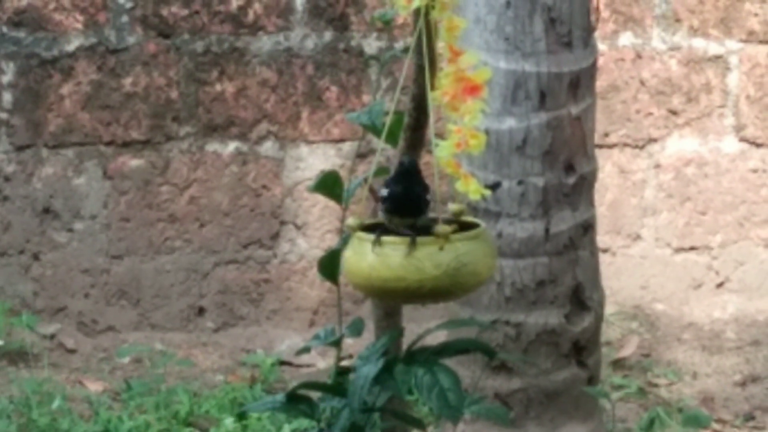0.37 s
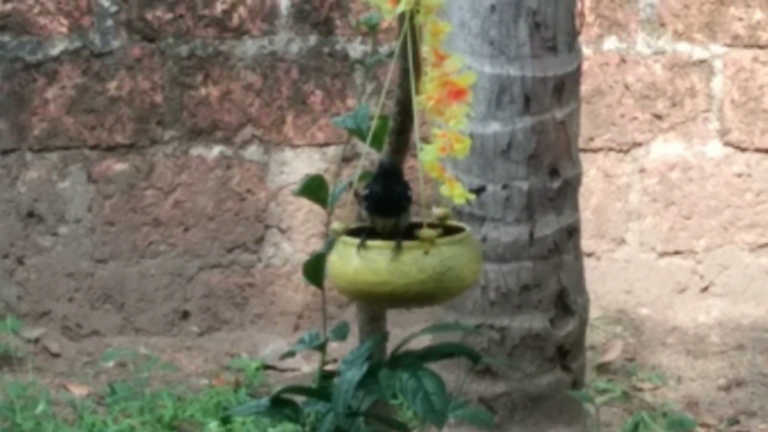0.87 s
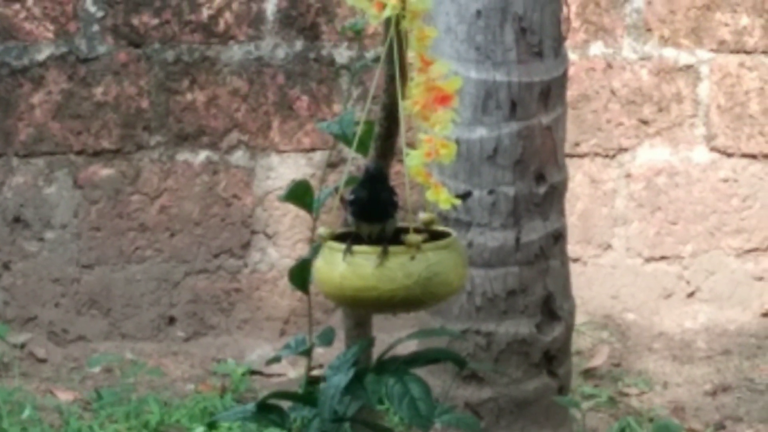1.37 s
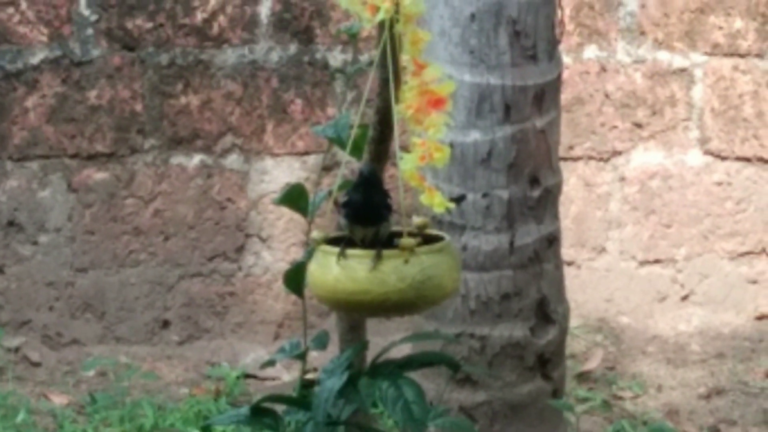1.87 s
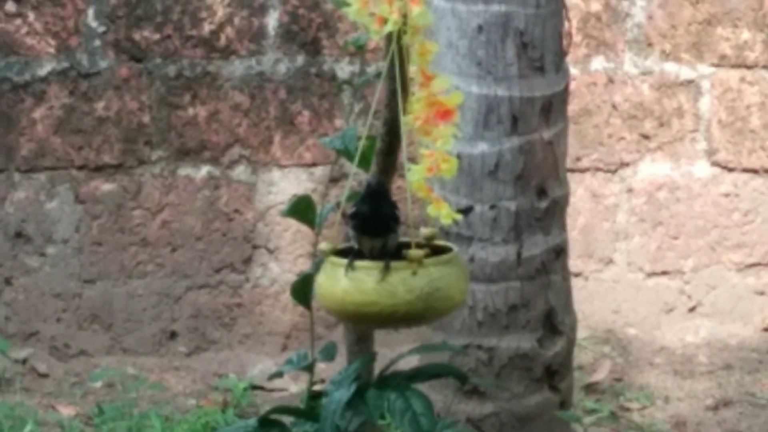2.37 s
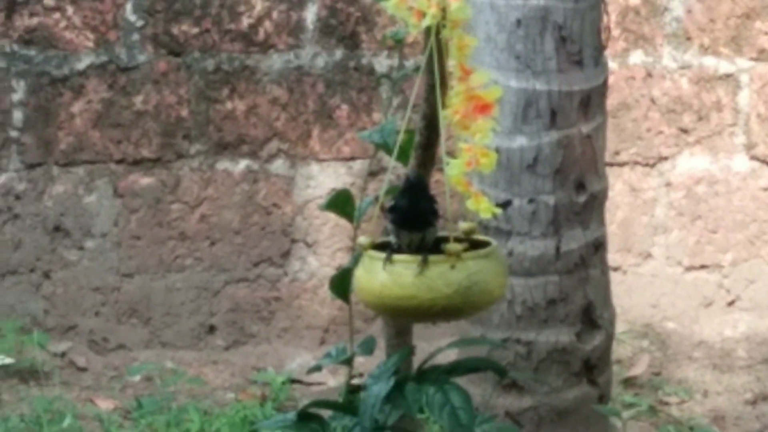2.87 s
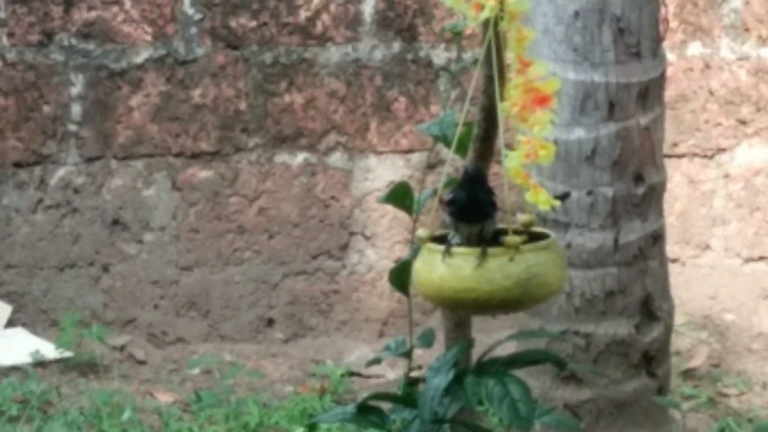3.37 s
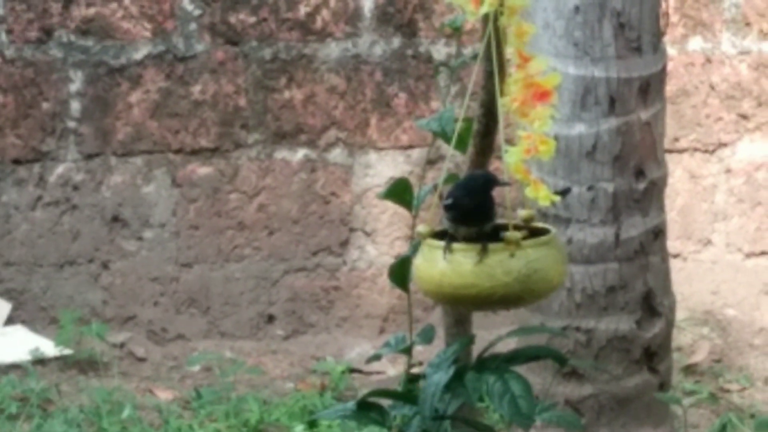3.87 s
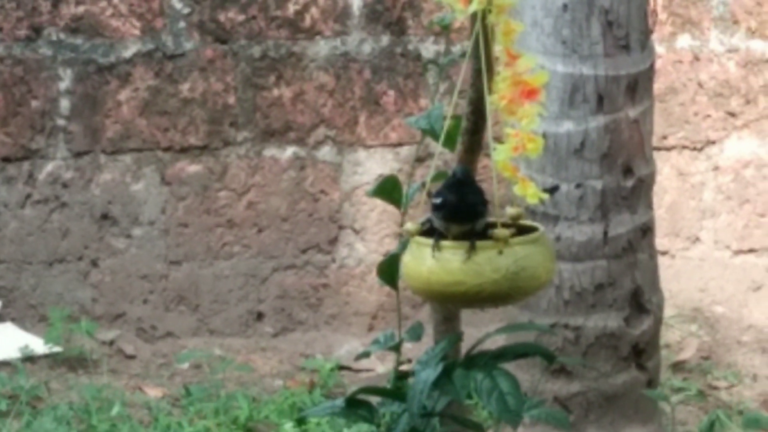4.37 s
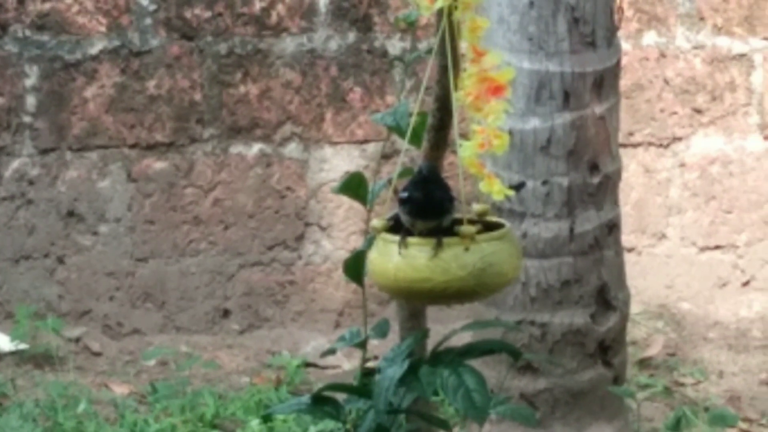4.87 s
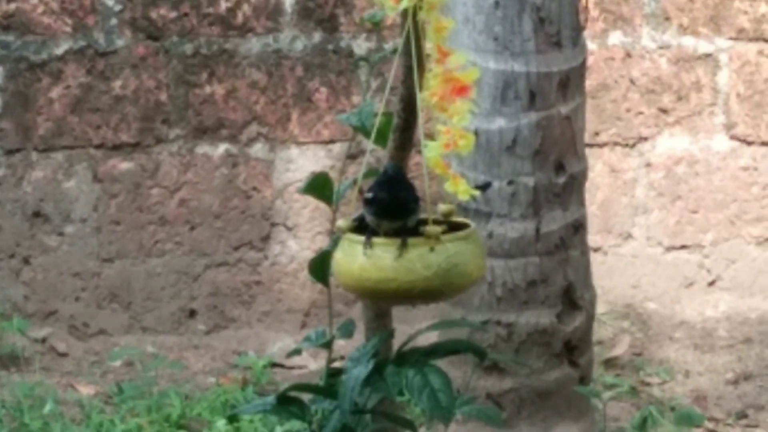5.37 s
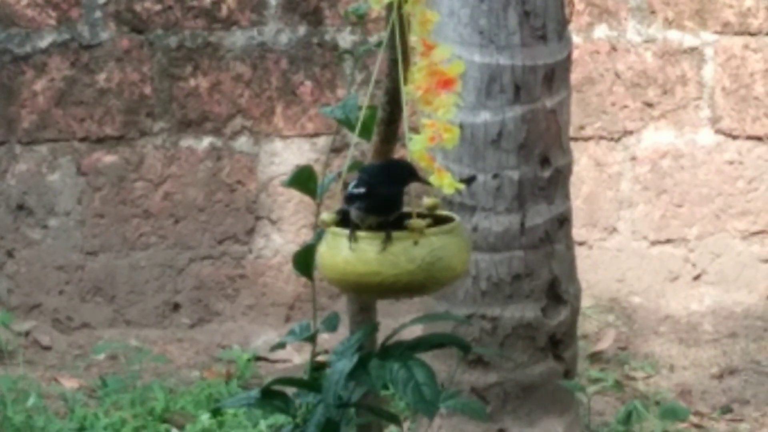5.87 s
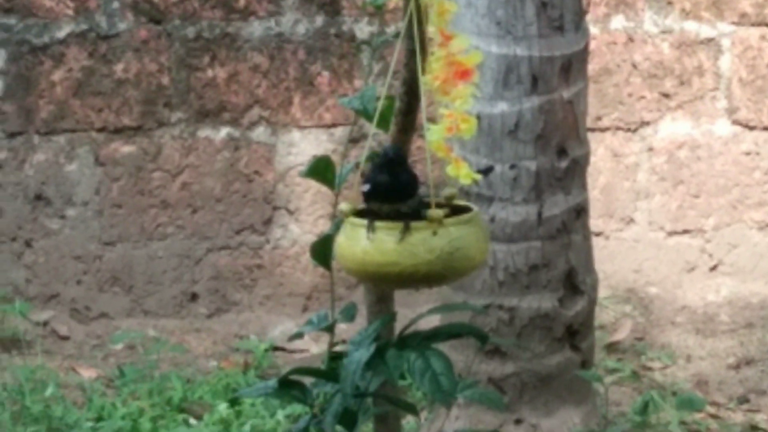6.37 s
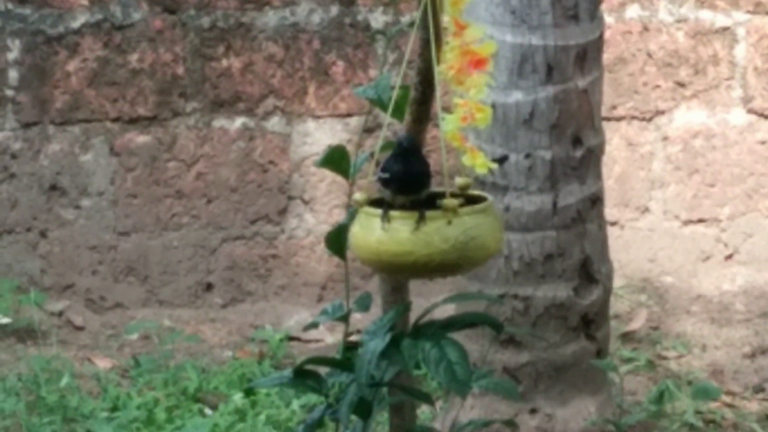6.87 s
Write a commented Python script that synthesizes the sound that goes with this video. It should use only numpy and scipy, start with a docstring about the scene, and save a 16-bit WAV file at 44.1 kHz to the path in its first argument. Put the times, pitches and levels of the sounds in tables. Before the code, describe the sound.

Squeaky, raspy bird chatter in a walled garden, joined midway by a nearer songbird's bright piercing whistles, over soft leaf hiss and distant traffic rumble.

```python
"""Birds in a walled garden

A flock of squeaky birds chatters while a nearer songbird whistles and churrs; a larger bird calls twice far away.
Each voice sums overtones of a clear tone and of a rasp whose pitch wanders at random; walls and leaves scatter it.
Below lie filtered noise for leaf hiss and distant traffic, and resonances for the traffic drone.
The treble of this air dips twice early on and flickers inside the dips."""
import sys
import numpy as np
from scipy import signal
from scipy.fft import rfft, irfft
from scipy.io import wavfile

SR = 44100
rng = np.random.default_rng(int(sys.argv[2]) if len(sys.argv) > 2 else 0)


def dump(signal):
    """Clip the signal to [-1, 1] and save it as 16-bit WAV at the path in sys.argv[1]."""
    limited = np.clip(np.atleast_2d(signal).T, -1, 1)
    pcm = np.round(limited * 32767).astype(np.int16)
    wavfile.write(sys.argv[1], SR, pcm)


def ratio(d):
    """dB to gain"""
    e = np.asarray(d, float) / 20
    return 10 ** e


N = 307818
TIME = np.arange(N) / SR   # s
HZ = np.fft.rfftfreq(N, 1 / SR) + 1   # shifted by 1 Hz so that its logarithm exists


def rms_one(x):
    """Normalisation: scale a signal to a root mean square of 1."""
    return x / np.sqrt(np.mean(x ** 2) + 1e-20)


def at_hz(points):
    """Spectral envelope: interpolate a (Hz, value) table along logarithmic frequency."""
    hz, value = np.transpose(points)
    return np.interp(np.log(HZ), np.log(hz), value)


def wander(size, rate_hz):
    """Random modulation: white noise through a two-pole low-pass, scaled to rms 1."""
    r = np.exp(-2 * np.pi * rate_hz / SR)
    settle = 2000   # samples dropped while the filter settles
    noise = rng.standard_normal(size + settle)
    return rms_one(signal.lfilter([1], [1, -2 * r, r * r], noise)[settle:])


def voice(notes, clear_tones, rasp_tones, waver, hoarse, flutter_db, chaos, chaos_hz, sag, strain, burst_db):
    """Vibrating membrane: steady motion gives clear overtones, chaotic motion a lower, randomly wandering pitch.

    A note lists points (time_s, pitch_hz, clear_db, rasp_db); waver, hoarse, chaos and sag are shares of pitch."""
    out = np.zeros(N)
    for note in notes:
        s, *columns = np.transpose(note)
        span = slice(int(s[0] * SR), min(int(s[-1] * SR), N))
        t = TIME[span]
        hz, clear_db, rasp_db = [np.interp(t, s, column) for column in columns]
        size = len(hz)

        # the clear tone turns hoarse as the rasp takes over
        roughness = 1 / (1 + ratio(clear_db - rasp_db) ** 2)
        steady_hz = hz * (1 + (waver + hoarse * roughness) * wander(size, 111.8))
        broken_hz = sag * hz * (1 + chaos * wander(size, chaos_hz))
        steady_phase = np.cumsum(2 * np.pi * steady_hz / SR)
        broken_phase = np.cumsum(2 * np.pi * broken_hz / SR)

        clear_db = clear_db + flutter_db * wander(size, 78)   # uneven breath
        rasp_db = rasp_db + burst_db * wander(size, 69.4)   # the rasp comes in bursts
        ramp = np.clip(np.minimum(t - s[0], s[-1] - t) / .008, 0, 1)   # 8 ms at either end
        for phase, db, tones in (steady_phase, clear_db, clear_tones), (broken_phase, rasp_db, rasp_tones):
            effort_db = strain * (db - db.max())   # higher overtones grow more with effort
            for multiple, tone_db in tones:
                level = ratio(db + tone_db + multiple * effort_db)
                out[span] += ramp * level * np.sin(multiple * phase)
    return out


def shaped(shape, s, hz, length, db, rasp_db):
    """Similarity: stretch one note shape to a given start, pitch, length and levels."""
    return [(s + share * length, pitch * hz, db + clear, rasp_db + rasp) for share, pitch, clear, rasp in shape]


def flock():
    """Onset of chaos: each squeak slides up to pitch, holds, then sags and breaks into a rasp."""
    # squeaks: start_s, pitch_hz, opening slide (share of pitch), clear_s, clear_db, rasp_db
    squeaks = [(.97, 2025, .05, 0.04176, -65, -64), (1.1, 2060, .05, .05, -66.5, -65.5),
               (1.268, 2250, 0.13, 0.112, -55.5, -62.5), (1.663, 2390, .11, .097, -51, -55),
               (1.85, 2346, .05, 0.0498, -50, -55), (2.11, 2432, 0, 0.052, -61.5, -60),
               (2.234, 2558, .04, .105, -43, -51.5), (2.43, 2198, 0.0021, 0.0404, -54.5, -58),
               (2.805, 2390, 0.0513, 0.074, -47.5, -49), (2.99, 2323, .03, 0.06906, -45.5, -50),
               (3.59, 2356, 0.0021, .083, -49, -50), (4.199, 2298, 0.017, 0.0933, -49.5, -55),
               (4.595, 2236, 0, 0.096, -52, -54.5), (5.008, 2336, 0.0115, .095, -47.5, -54),
               (5.2, 2212, 0.018, 0.0439, -54, -53.5), (5.34, 2176, .05, 0.0604, -53, -56),
               (5.51, 2181, .03, 0.0356, -54, -54), (5.64, 2210, 0.037, 0.0592, -52, -54.5),
               (5.8, 2233, .05, 0.049, -50, -53), (5.93, 2169, 0.076, 0.0967, -54.5, -54),
               (6.1, 2301, 0.043, 0.0267, -58, -60), (6.362, 2338, 0.089, 0.139, -49, -50.5),
               (6.59, 2193, 0.028, 0.0596, -47.5, -55), (6.68, 2441, 0.068, 0.0374, -49, -53),
               (6.82, 2008, 0.042, 0.0311, -55.5, -57.5), (6.92, 1730, 0.0032, 0.046, -67.5, -61)]
    # overtones of the clear tone: multiple, level_db
    clear_tones = [(1, -1), (2, 2.5), (3, -5.5), (4, -15), (5, -14), (6, -15)]
    # overtones of the rasp: multiple, level_db
    rasp_tones = [(1, -0.5), (2, 1.5), (3, -2), (4, -10.5), (5, -30.5), (6, -8.5)]
    attack_s, rasp_s = 0.011924, .125
    slide_per_s = 2.5   # share of pitch per second
    rasp_sag = 0.0361   # share of pitch lost during the rasp
    onset_db, before_break_db = -10, -11   # clear tone at the start; rasp before the break
    fade_db, rasp_fade_db = -14, -7.5   # clear tone and rasp at the end

    notes = []
    for s, hz, scoop, clear_s, db, rasp_db in squeaks:
        early_rasp_db = rasp_db + before_break_db
        slide_s = max(attack_s + 0.00065, min(scoop / slide_per_s, 0.608 * clear_s))
        break_s = s + clear_s
        notes.append([
            (s, (1 - scoop) * hz, db + onset_db, early_rasp_db),
            (s + attack_s, (1 - .7 * scoop) * hz, db - 6, early_rasp_db),
            (s + slide_s, hz, db, early_rasp_db),
            (break_s, hz, db, early_rasp_db),
            (break_s + .006, hz, db - 3, rasp_db),
            (break_s + rasp_s, (1 - rasp_sag) * hz, db + fade_db, rasp_db + rasp_fade_db)])
    return voice(notes, clear_tones, rasp_tones, waver=.008, hoarse=0.0549, flutter_db=2.5,
                 chaos=0.18, chaos_hz=1438.2, sag=0.97, strain=0.0437, burst_db=1.0)


def songbird():
    """Frequency modulation: hooks, falling sweeps and level whistles come from one clear throat."""
    # hooks, up to a top then down onto a landing note: start_s, top_hz, landing_hz, landing_s, level_db
    hooks = [(3.238, 4922, 3119, 0.03445, -36.5), (3.46, 4746, 3211, 0.0367, -36)]
    # falling sweeps: start_s, pitch_hz, length_s, level_db
    sweeps = [(3.664, 4837, .17, -39), (4.079, 4680, .16, -39.5)]
    # shape of a sweep: share of length, share of pitch, clear_db, rasp_db
    sweep_shape = [(0, 0.997, -23, -26.5), (.15, .86, -6, -16), (.3, .73, 0.5, -8.5), (.5, .63, -11, -7),
                   (.75, .57, -16.5, -15.5), (1, .5, -31.5, -20)]
    # level whistles, loud and faint: start_s, pitch_hz, length_s, level_db, churr_db
    whistles = [(1.974, 2880, 0.1065, -62, -67), (2.473, 2724, 0.0994, -53.5, -59),
                (2.633, 1766, 0.24, -66.5, -65), (2.961, 4198, 0.0812, -55.5, -53.5),
                (3.893, 3166, 0.1136, -30.5, -48.5), (4.314, 3069, 0.1313, -34.5, -51.5),
                (4.572, 2991, 0.1345, -36, -49), (6.444, 1710, 0.087, -60.5, -81)]
    # shape of a whistle, churring in the middle: share of length, share of pitch, clear_db, churr_db
    whistle_shape = [(0, 1, -11, -1.5), (.12, .99, -3.5, -1.5), (.35, .985, -4.5, -2),
                     (.6, 1.01, -4.5, 2.5), (.85, 1.005, -1.5, -23.5), (1, 1.01, -37, -11)]
    # overtones of the clear tone: multiple, level_db
    song_tones = [(1, 5), (2, -15.5), (3, -11), (4, -19.5)]
    # overtones of the churr: multiple, level_db
    churr_tones = [(1, 5.5), (2, -11.5), (3, -3), (4, -19)]
    hook_start, knee = .78, .93   # shares of the top pitch at the start and in mid-rise
    rise_s, top_s, drop_s, churr_s = 0.029, .018, .011, 0.0385
    start_db, top_db, landing_db = -4, 0, -1   # clear tone
    hook_rasp_db, hook_churr_db = -15.5, -8   # rasp under it; churr after the landing

    notes = []
    for s, top, low, landing_s, db in hooks:
        steps_s = [0, rise_s / 2, rise_s / 2, top_s, drop_s / 2, drop_s / 2, landing_s, churr_s]
        times = s + np.cumsum(steps_s)
        pitch = [hook_start * top, knee * top, top, top, (top + 2 * low) / 3, low, low, low]
        clear = [start_db, start_db, top_db, top_db - 6, top_db - 6, landing_db, landing_db - 3, -30]
        rasp = [hook_rasp_db] * 6 + [hook_churr_db - 3, hook_churr_db]
        notes.append(np.transpose([times, pitch, db + np.array(clear), db + np.array(rasp)]))
    notes += [shaped(sweep_shape, *row, row[-1]) for row in sweeps]
    notes += [shaped(whistle_shape, *row) for row in whistles]
    return voice(notes, song_tones, churr_tones, waver=0.005362, hoarse=0.0747, flutter_db=2.48,
                 chaos=0.1557, chaos_hz=1422, sag=.9, strain=0.115, burst_db=3.0)


def far_caller():
    """Low-pitched membrane: a larger bird repeats one call far away."""
    # calls: start_s, pitch_hz, length_s, level_db
    calls = [(2.808, 531, .33, -75), (3.988, 534, .33, -68)]
    # shape of a call, level then sinking: share of length, share of pitch, clear_db, rasp_db
    call_shape = [(0, .91, -8, -24.5), (.1, 0.992, -2, -22), (.43, 0.99, -0.5, -20), (.5, .93, -2.5, -5),
                  (.8, .885, -10.5, -8.5), (1, 0.78, -21.5, -13.5)]
    # overtones of clear tone and rasp alike: multiple, level_db
    call_tones = [(1, -31.5), (2, 8.5), (3, 18), (4, -25.5)]
    notes = [shaped(call_shape, *row, row[-1]) for row in calls]
    return voice(notes, call_tones, call_tones, waver=0.009, hoarse=0.016, flutter_db=0.5,
                 chaos=0.0964, chaos_hz=191.4, sag=0.98, strain=0.186, burst_db=-2.5)


def garden(x, lead_s, scatter_db):
    """Reverberation: direct sound reaches the left port first; near walls and leaves return a lumpy dying scatter."""
    garden_t60_s, wall_t60_s, wall_db = 1, .12, 12   # walls start louder and die sooner
    lumpy_db = 4
    t = TIME[:SR]
    lumps = ratio(lumpy_db * np.array([wander(SR, 180), wander(SR, 63.3)]))
    decay = ratio(-60 * t / garden_t60_s) + ratio(wall_db - 60 * t / wall_t60_s)
    gap = np.clip((t - .003) / 0.00183, 0, 1)   # nothing returns in the first 3 ms
    scatter = rng.standard_normal((2, SR)) * lumps * decay * gap
    # scatter energy relative to the direct sound
    scatter *= ratio(scatter_db) / np.sqrt(np.sum(scatter ** 2, axis=1, keepdims=True))
    late = np.interp(TIME - lead_s, TIME, x)
    return np.array([x, late]) + signal.fftconvolve(x[None], scatter, axes=1)[:, :N]


def treble_db():
    """Gain modulation: the air's treble follows a slow curve with dips that flicker."""
    # slow curve of the treble: time_s, level_db
    slow_curve = [(0, 3), (1, 3), (1.55, 9), (1.64, -2.5), (1.7, 9), (6.98, 9)]
    # dips at full depth: start_s, end_s, depth_db before flicker
    treble_dips = [(0.139, 0.466, -22), (0.837, 0.925, -23.5)]
    fall_s, rise_s = 0.0196, 0.05   # before the start and after the end of full depth
    flicker_gap_s, flicker_s, flicker_share = .04, .016, .8   # mean gap; creep time constant; share of dip

    # inside a dip the treble creeps back and is cut again
    gap, size = rng.random((int(2 * N / SR / flicker_gap_s) + 9, 2)).T
    cuts = np.cumsum((gap + .5) * flicker_gap_s)
    upcoming = np.searchsorted(cuts, TIME)
    creep = np.sqrt(size[upcoming]) * np.exp((TIME - cuts[upcoming]) / flicker_s)
    dips = np.zeros(N)
    for start, end, db in treble_dips:
        dips += db * np.clip(np.minimum((TIME - start) / fall_s + 1, (end - TIME) / rise_s + 1), 0, 1)
    return np.interp(TIME, *np.transpose(slow_curve)) + dips * (1 - flicker_share * creep)


def air():
    """Partly coherent noise: leaf hiss and traffic rumble, most alike at both ports in the bass, and a shared drone."""
    # noise spectrum, relative: frequency_hz, density_db
    spectrum = [(20, 0.5), (33, -7.5), (42, -11), (50, -9.5), (260, -12.5), (320, -10.5), (420, -18),
                (630, -22), (900, -24), (1150, -33), (1700, -27), (3400, -33), (7000, -39.5),
                (15500, -50.5)]
    # correlation of left and right: frequency_hz, likeness (-1 to 1)
    likeness = [(60, 0.177), (150, 1), (380, 0.778), (950, -0.115), (2380, -0.148), (5980, 0.072),
                (15000, -0.45)]
    # traffic drone resonances: centre_hz, width_hz, level_db
    resonances = [(56.23, 13, -60.5), (105.48, 16.4, -63.5), (412.6, 45.3, -67.5)]
    noise_db, treble_from_hz = -53, 963   # noise level before the treble gain

    mid, side, drone = rfft(rng.standard_normal((3, N)))
    alike = np.clip(at_hz(likeness), -1, 1)
    pair = np.sqrt(1 + alike) * mid + np.sqrt(1 - alike) * side * [[1], [-1]]
    noise = ratio(noise_db) * rms_one(irfft(pair * ratio(at_hz(spectrum)), N))
    low_pass = signal.butter(2, treble_from_hz, fs=SR, output="sos")
    low = signal.sosfiltfilt(low_pass, noise)
    noise = low + (noise - low) * ratio(treble_db())
    for hz, width_hz, db in resonances:
        resonance = drone / (1 + (2 * (HZ - hz) / width_hz) ** 2)
        noise += ratio(db) * rms_one(irfft(resonance, N))
    return noise


def scene():
    """Superposition: three bird voices, each scattered by the garden, add to the air."""
    birds = garden(flock(), lead_s=.00004, scatter_db=3.5)
    birds = birds + garden(songbird(), lead_s=.00003, scatter_db=2.0)
    birds = birds + garden(far_caller(), lead_s=0.000207, scatter_db=1.0)
    return birds + air()


def band_limit(x):
    """A steep low-pass at the top of the band."""
    return signal.sosfilt(signal.butter(12, 15680, fs=SR, output="sos"), x)


def record(dry):
    """Linear filtering: a microphone with a dip near 9 kHz, two ports unlike in the treble, and self-noise."""
    # colour common to both ports: frequency_hz, level_db
    mic_colour = [(1000, 3), (7500, 3), (8200, -4.5), (9300, -10.5), (10500, -2.5), (12500, -17),
                  (15500, -15.5)]
    # left minus right: frequency_hz, difference_db
    port_difference = [(40, -0.92), (120, 0.1), (300, -2.5), (700, 0.02), (1400, -0.5), (3000, -0.43),
                       (4500, 2), (7000, 12), (8200, 3), (9500, -16.5), (15000, -11)]
    colour = ratio(at_hz(mic_colour) + at_hz(port_difference) * [[.5], [-.5]])
    hiss = ratio(-87) * rng.standard_normal(dry.shape)   # microphone self-noise
    mix = irfft(rfft(dry) * colour, N) + hiss
    return band_limit(mix)


dry = scene()
out = record(dry)
dump(out)
```